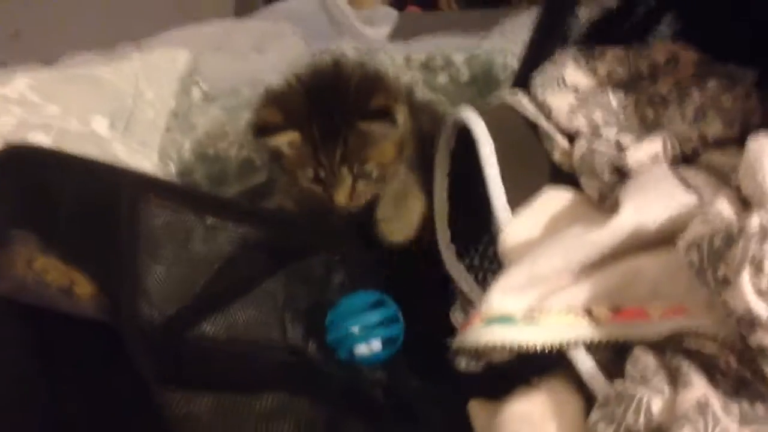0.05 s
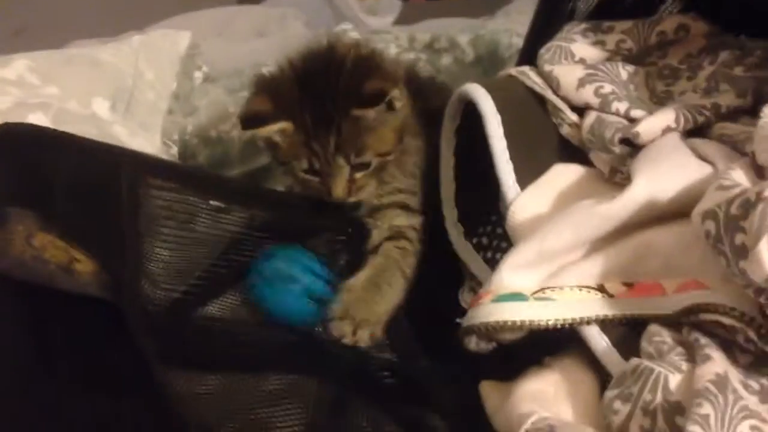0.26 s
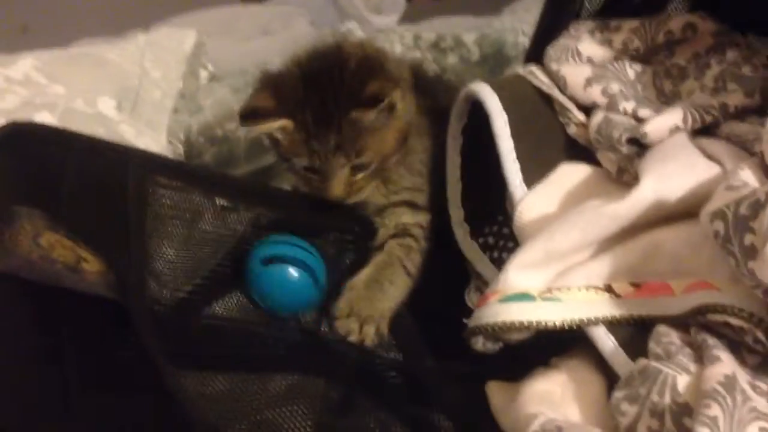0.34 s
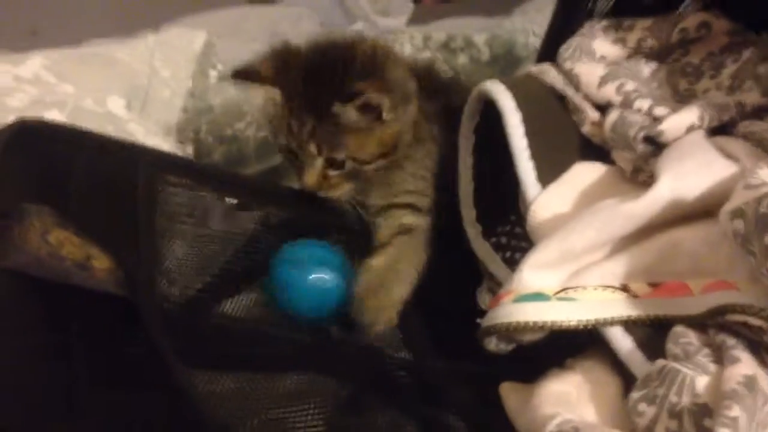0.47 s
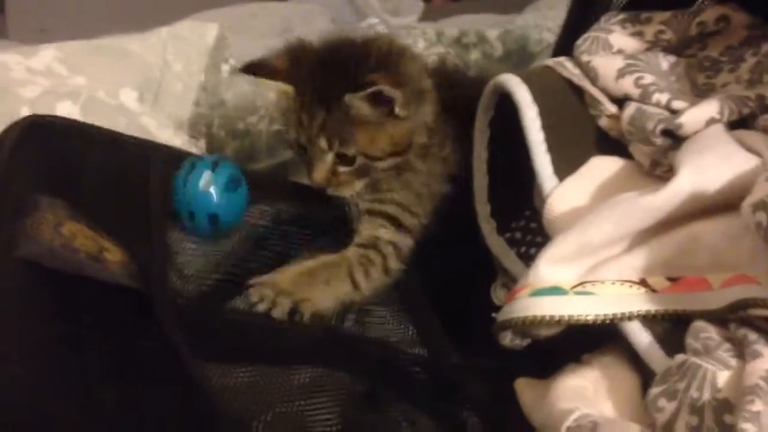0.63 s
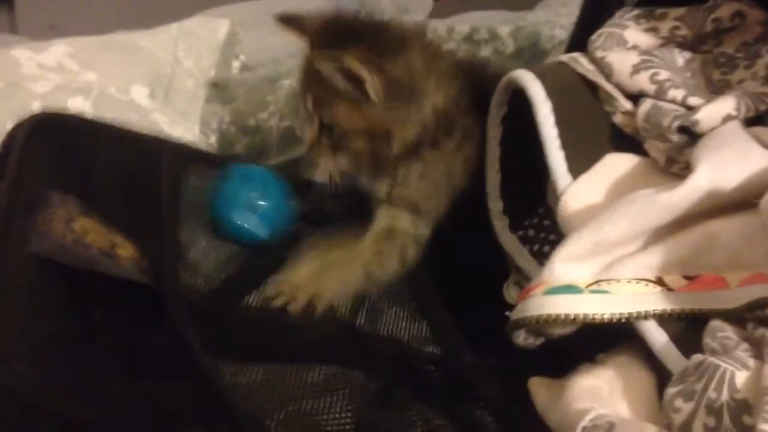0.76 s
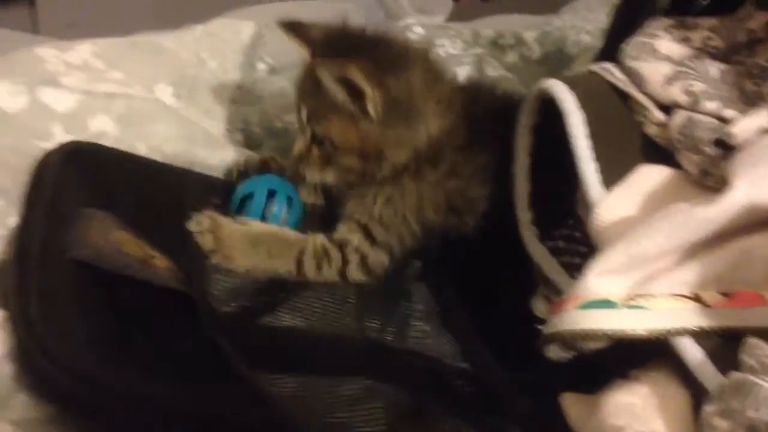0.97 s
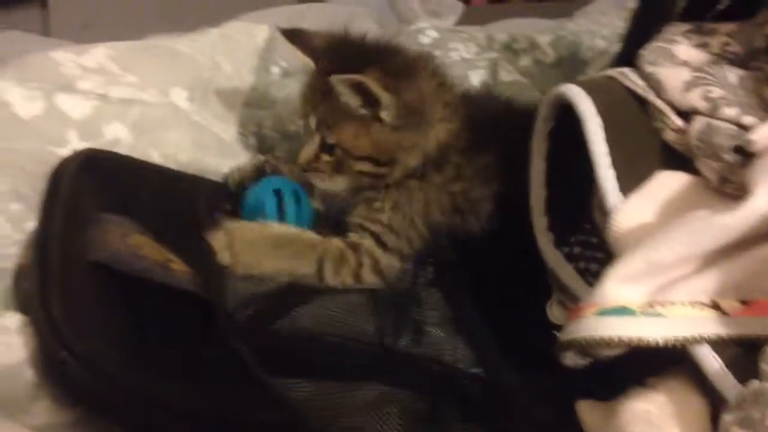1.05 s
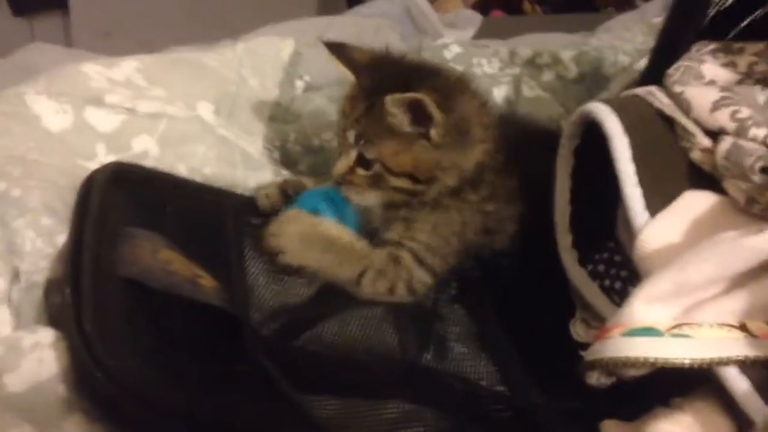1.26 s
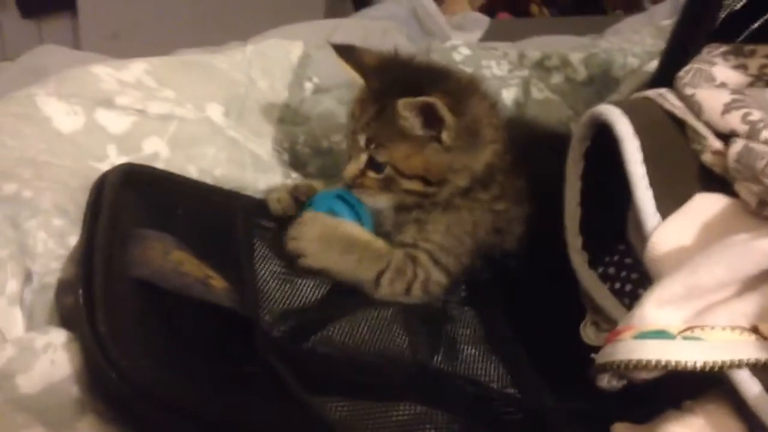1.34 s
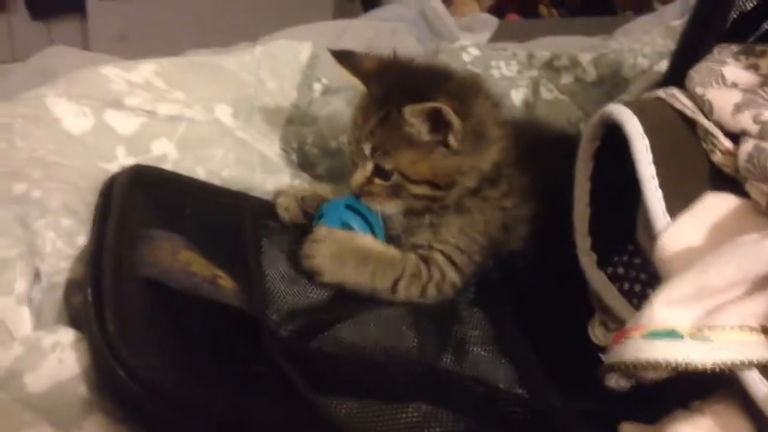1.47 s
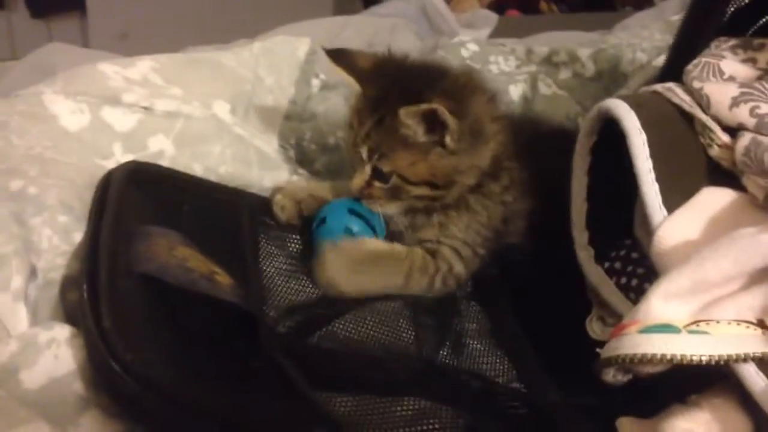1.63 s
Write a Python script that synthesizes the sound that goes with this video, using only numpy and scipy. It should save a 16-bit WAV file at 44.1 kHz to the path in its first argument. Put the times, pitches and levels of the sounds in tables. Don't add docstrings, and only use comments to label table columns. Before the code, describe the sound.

A small bell in a plastic ball jingles as a kitten bats it. Quiet room hum and a soft paw thump open; light ticks start near 0.2 s, then sharp, very high jingles and hollow plastic knocks crowd together from 0.42 to 0.97 s, with faint cloth rustle. They thin to sparse tinkles, one clearer at 1.28 s, with a soft thump at 1.4 s, leaving hum and faint hiss.

```python
import sys
import numpy as np
from scipy import signal
from scipy.fft import rfft, irfft
from scipy.io import wavfile
from scipy.ndimage import uniform_filter1d

SR = 44100
rng = np.random.default_rng(int(sys.argv[2]) if len(sys.argv) > 2 else 0)


def unload_wav(signal):
    wavfile.write(
        sys.argv[1],
        SR,
        np.round(np.clip(np.atleast_2d(signal).T, -1, 1) * 32767).astype(np.int16),
    )


def amplitude_ratio(level_db):
    exponent = np.asarray(level_db, float) / 20
    return 10 ** exponent


N = 74970
TIME = np.arange(N) / SR

# t/s, level/dB
STIRRING = [(0, -83), (.185, -107), (.205, -65.5), (.3, -62), (.36, -92), (.43, -84), (.49, -67.5),
            (.6, -64.5), (.67, -71), (.77, -76.5), (.85, -66), (.95, -57), (1.05, -67), (1.13, -72),
            (1.4, -83), (1.47, -87.5)]
# f/Hz, level/dB
BRIGHT_COLOUR = [(1500, -13.5), (4500, -8.5), (5600, -2), (8500, 6.5), (10500, -11.5), (15000, -26)]


def evened(x):
    return x / np.sqrt(np.mean(x ** 2) + 1e-20)


def add(mix, start_s, sound):
    part = mix[max(round(start_s * SR), 0):][:len(sound)]
    part += sound[:len(part)]


def along(curve):
    return amplitude_ratio(np.interp(TIME, *np.transpose(curve)))


def colour(x, points):
    f, db = np.transpose(points)
    hz = np.fft.rfftfreq(len(x), 1 / SR)
    gain = amplitude_ratio(np.interp(np.log(hz + 1), np.log(f + 1), db))
    return irfft(rfft(x) * gain, len(x))


def resonate(x, hz, width_hz):
    turn = np.exp(2j * np.pi * hz * np.arange(len(x)) / SR)
    r = np.exp(-np.pi * abs(width_hz) / SR)
    smooth = signal.lfilter([1 - r], [1, -r], x / turn)
    return 2 * (turn * smooth).real


def high(x, hz):
    return signal.sosfilt(signal.butter(4, hz, "high", fs=SR, output="sos"), x)


def grit(per_s, spread_db):
    chance, size, sign = rng.random((N, 3)).T
    strength = amplitude_ratio(-spread_db * np.log(size + 1e-3))
    return evened((chance < per_s / SR) * strength * (sign - .5))


def snap(noise, t60):
    fade = amplitude_ratio(-60 * np.arange(len(noise)) / SR / t60)
    burst = noise * fade
    burst = burst * np.linalg.norm(fade) / np.linalg.norm(burst)
    return colour(burst, BRIGHT_COLOUR)[:len(noise) // 2]


def bell():
    # t/s, level/dB, place on the rim/degrees, ring time to -60 dB/s
    pellet_strikes = [(.0715, -65, 7, 0.07), (.2085, -63, 27, 0.022), (.2122, -48, 11, 0.022),
                      (.2399, -30, 8, 0.036), (.287, -48, 1, 0.073), (.3255, -55, 17, 0.024),
                      (.335, -55, 77, 0.042), (.3953, -45.5, 7, 0.035), (.4242, -25, 26, 0.0072),
                      (.4431, -36.5, -8, 0.038), (.4576, -33, -10.5, 0.045), (.4666, -32.5, 10, 0.043),
                      (.478, -47.5, 13, 0.16), (.4875, -33.5, 12, 0.012), (.494, -43, 13.5, 0.081),
                      (.5165, -45.5, 12, 0.05), (.5412, -46.5, 26, 0.061), (.5584, -18.5, 47.5, 0.039),
                      (.58, -38.5, 49, 0.16), (.5918, -30.5, -0.5, 0.053), (.6013, -65, 37, .08),
                      (0.626, -26.5, -27, 0.032), (0.648, -32, 5.5, 0.034), (.6582, -87, 8, .08),
            (0.6781, -29, 12, .035), (0.6999, -29.5, -14, .04), (.716, -20, 34, 0.032),
            (.7245, -47, -19, .03), (0.7299, -22, 22, 0.044), (0.7431, -28, 13.5, 0.038),
            (.761, -44, 20.5, 0.059), (0.7891, -48, 11, 0.033), (0.8045, -34.5, 11, .035),
            (0.8287, -39, 38, .06), (0.8347, -35.5, 41, 0.044), (0.841, -38.5, 15, 0.055),
            (0.863, -42, 20, 0.036), (0.8652, -31, 52, 0.06), (0.9098, -24, 13, 0.038),
            (.921, -29.5, -32, .025), (0.931, -52, 30, .05), (0.9384, -32, 18, 0.084),
            (0.9465, -31, 31, 0.032),
                      (0.974, -44, 33, 0.026), (0.987, -32.5, 6, 0.067), (1.0003, -34.5, -50, 0.065),
             (1.0258, -38, -25, 0.055), (1.035, -40, 43, 0.046), (1.047, -45.5, 20, 0.055),
             (1.0565, -51.5, 26, 0.073), (1.076, -56, 22, 0.05), (1.1145, -73, 16, 0.041),
             (1.1328, -63.5, 65, 0.15), (1.191, -58, 28, 0.082), (1.2405, -57, 20, 0.047),
             (1.2822, -36.5, 10, 0.039), (1.298, -54.5, 7.2, 0.16), (1.349, -72, 6, 0.037),
             (1.37, -43.5, 13, 0.035), (1.395, -55, 15, 0.067), (1.4066, -54.5, 1, 0.04)]
    bell_hz, upper_hz, detune_hz = 9590, 9810, 15.5
    choked_gain, choke_s = .2, 0.000745
    strikes = pellet_strikes
    next_contacts = [strike[0] for strike in strikes[1:]] + [N / SR]
    out, t = np.zeros(N), np.arange(SR // 8) / SR
    detunes = rng.standard_normal((len(strikes), 2))
    noises = rng.standard_normal((len(strikes), 512))
    for strike, after, (a, b), noise in zip(strikes, next_contacts, detunes, noises):
        s, db, deg, t60 = strike
        lower = np.cos(np.radians(deg)) * np.sin(2 * np.pi * (bell_hz + detune_hz * a) * t)
        upper = np.sin(np.radians(deg)) * np.sin(2 * np.pi * (upper_hz + detune_hz * b) * t)
        fade = amplitude_ratio(db - 60 * t / max(t60, .01))
        choke = choked_gain + (1 - choked_gain) * np.clip((after - s - t) / choke_s, 0, 1)
        onset = np.minimum(t / 0.0003, 1)
        add(out, s, fade * (lower - upper) * choke * onset)
        tick_db = 0.49 * (db + 49.5) - 45 + 3
        add(out, s, amplitude_ratio(tick_db) * high(snap(noise, .0018), 5000))
    return out + pellet_skitter(bell_hz, upper_hz)


def pellet_skitter(bell_hz, upper_hz):
    contacts = grit(240, 2.5) * (np.arange(N) < 1.43 * SR)
    ring = resonate(contacts, bell_hz, 44.9) - .5 * resonate(contacts, upper_hz, 70)
    ticks = high(colour(contacts, BRIGHT_COLOUR), 5000)
    return along(STIRRING) * (amplitude_ratio(1) * evened(ring) + amplitude_ratio(-13) * ticks)


def taps():
    # t/s, peak level/dB, pitch f/Hz, width as a share of the pitch
    shell_knocks = [(0.234, -43.5, 7040, 0.26), (0.2364, -44, 6140, .25), (.327, -53, 3400, 0.56),
                    (.391, -48.5, 4540, 0.89), (0.4247, -36, 5450, 0.31), (0.469, -44, 2500, 0.37),
                    (.487, -40.5, 2980, 1), (.494, -38, 3250, 0.64), (0.543, -44, 1500, 2),
                    (0.5452, -43, 3570, 0.52), (0.557, -42.5, 2500, 0.6), (0.5691, -36, 2840, 0.43),
                    (.626, -50, 4000, 1.4), (0.639, -47, 1590, .6), (0.6429, -46.5, 3000, 1.1),
                    (.647, -42, 3400, 0.66), (.651, -48.5, 2600, 1.1), (.678, -48, 2770, 0.37),
                    (.7135, -46.5, 1690, 1.1), (.716, -42, 3500, .9), (.742, -52, 2500, 0.75),
                    (.8125, -49, 2780, 0.4), (0.882, -45.5, 1590, 0.43), (.9, -44.5, 770, 1.3),
                    (.909, -42, 3050, 0.65), (.923, -42, 3500, 1.3), (0.941, -45, 1570, 0.23),
                    (0.947, -40, 2590, 0.32), (0.9718, -32.5, 2240, 0.64), (1.027, -46.5, 2100, 0.45),
                    (1.052, -54, 2200, .6), (1.068, -46.5, 2200, .6), (1.076, -45, 2480, .9),
                    (1.091, -49, 1450, 0.31), (1.118, -51.5, 2140, 0.68), (1.215, -51.5, 2760, 0.89),
                    (1.236, -53.5, 2820, 0.12), (1.349, -56.5, 2970, 0.65), (1.371, -56, 2190, 1.1)]
    # t/s, peak level/dB
    bar_clicks = [(.197, -60), (0.2, -58), (.2045, -62), (.253, -53), (0.3036, -49), (.335, -42.5),
                  (.3495, -55), (.476, -46), (.482, -39), (0.51, -43), (.513, -41), (.528, -54),
                  (0.5449, -33), (.5695, -26.5), (0.58, -41), (0.584, -33), (.5875, -52.5), (.626, -31),
                  (0.658, -47), (0.7134, -45.5), (0.7159, -29.5), (0.7004, -40.5), (0.784, -42.5),
                  (.8125, -52), (.8559, -36.5), (.862, -36), (0.8813, -41), (0.894, -48.5), (.9094, -20),
                  (.9234, -31), (0.933, -37), (.955, -56), (.972, -29.5), (0.9738, -35.5), (1.026, -36),
                  (1.055, -45), (1.077, -50), (1.143, -59), (1.187, -53), (1.197, -56), (1.24, -41.5),
                  (1.247, -55), (1.32, -53.5), (1.335, -47.5), (1.37, -43), (1.348, -50)]
    knock_t60, click_t60, snap_db = .005, .003, -4
    out, t = np.zeros(N), np.arange(512) / SR
    noises = rng.standard_normal((len(shell_knocks) + len(bar_clicks), 512))
    for (s, db, hz, wide), noise in zip(shell_knocks, noises):
        burst = noise * amplitude_ratio(-60 * t / knock_t60)
        knock = resonate(resonate(burst, hz, wide * hz), hz, wide * hz)
        edge = amplitude_ratio(snap_db) * high(burst, 0.5 * hz) * wide / 2
        add(out, s, amplitude_ratio(db) * (knock / abs(knock).max() + edge))
    for (s, db), noise in zip(bar_clicks, noises[len(shell_knocks):]):
        click = snap(noise, click_t60)
        add(out, s, amplitude_ratio(db) * click / abs(click).max())
    return out


def rustle():
    # f/Hz, level/dB
    cloth_colour = [(300, -28), (900, -6), (2200, -1), (4600, -9), (7500, -5.5), (9800, -6.5),
                    (11000, -16.5), (14500, -12.5)]
    rattles_per_s = 700
    low, bright = grit(rattles_per_s, 2), grit(rattles_per_s, 2)
    hollow = evened(resonate(resonate(low, 2307, 1440), 1950, 1300))
    rattle = hollow + amplitude_ratio(-22) * evened(colour(bright, BRIGHT_COLOUR))
    lumps = amplitude_ratio(4.5 * evened(uniform_filter1d(rng.standard_normal(N), 160)))
    rub = evened(colour(rng.standard_normal(N), cloth_colour)) * lumps
    return along(STIRRING) * (amplitude_ratio(0.5) * rub + amplitude_ratio(-5) * evened(rattle))


def thumps():
    # t/s, level/dB, f/Hz
    paw_pushes = [
        (.004, -44, 140),
        (0.079, -59, 93),
        (.905, -65, 64),
        (.925, -47.5, 151),
        (1.407, -47, 120.5),
        (1.509, -65, 72),
    ]
    # t/s, length/s, f/Hz, level/dB
    squeak = (.125, .1, 3270, -76)
    out, t = np.zeros(N), np.arange(SR // 10) / SR
    for s, db, hz in paw_pushes:
        swell = np.e * t * hz * np.exp(-t * hz * 1.66)
        add(out, s, amplitude_ratio(db) * swell * np.sin(2 * np.pi * hz * t))
    s, length, hz, db = squeak
    swell = np.sin(np.pi * np.clip(t / length, 0, 1))
    add(out, s, amplitude_ratio(db) * swell * np.sin(2 * np.pi * hz * t))
    return out


def room_tone():
    # f/Hz, level/dB
    air_colour = [(20, -56.5), (60, -38.5), (130, -9), (280, -8), (500, -16.5), (1100, -13.5), (2200, -24),
                  (5000, -43.5)]
    # t/s, level/dB
    room_drift = [(0.0, -56.5), (1.7, -62)]
    # f/Hz, width/Hz, level/dB
    hum_bands = [(183, 88, -6), (236.9, 23, -8.5), (297, 17, -9.5)]
    # f/Hz, level/dB
    hiss_colour = [(4000, 15), (9500, 9), (10800, -8), (12000, 9), (15000, 13.5)]
    air_noise, hum_noise, hiss_noise = rng.standard_normal((N, 3)).T
    hum = np.zeros(N)
    for hz, width, db in hum_bands:
        hum += amplitude_ratio(db) * evened(resonate(resonate(hum_noise, hz, width), hz, width))
    note_db = -1 - 5 * np.minimum(TIME, 1)
    hum += amplitude_ratio(note_db) * np.sin(2 * np.pi * 239.5 * TIME)
    air = evened(colour(air_noise, air_colour))
    hiss = amplitude_ratio(-85.5) * high(colour(hiss_noise, hiss_colour), 2500)
    return along(room_drift) * (amplitude_ratio(-3.5) * air + amplitude_ratio(-1) * hum) + hiss


def scene():
    ball, t = bell() + taps(), np.arange(SR // 5) / SR
    room_db, room_t60 = -15, .09
    tail = rng.standard_normal(len(t)) * amplitude_ratio(-60 * t / room_t60) * (t > .002)
    wet = signal.fftconvolve(ball, tail / np.linalg.norm(tail))[:N]
    return (ball + amplitude_ratio(room_db) * wet + rustle() + thumps() + room_tone())[None]


def low_pass(x):
    return signal.sosfilt(signal.butter(12, 16380, fs=SR, output="sos"), x)


def record(dry):
    # start t/s, end t/s, lowest f/Hz, highest f/Hz
    dropouts = [(0.208, 0.24, 10500, 11800), (0.287, .37, 10300, 11000), (.401, .42, 10700, 13600),
                (0.414, .478, 10740, 16000), (.562, .567, 11460, 14000), (.6, .62, 11800, 13200),
                (.48, .533, 10700, 11500), (0.67, .675, 10700, 13500), (0.683, .697, 10700, 16000),
                (0.699, .72, 14500, 16000), (.703, .713, 10700, 14600), (0.717, .758, 10770, 16000),
                (.758, .785, 10570, 11600), (.758, .77, 13500, 16000), (.79, 0.806, 10800, 14000),
                (.838, .882, 10800, 13000), (1.01, 1.035, 11200, 12700), (1.056, 1.075, 11600, 13400),
                (1.09, 1.23, 10600, 11050), (1.24, 1.256, 10500, 12000), (1.268, 1.287, 10500, 11300),
                (1.282, 1.3, 10600, 16000), (1.293, 1.365, 10500, 11100), (1.382, 1.41, 10300, 11600),
                (1.375, 1.39, 11600, 14000)]
    spike_db = -42
    x = signal.oaconvolve(dry, signal.firwin(255, 15400, fs=SR)[None], "same")
    lost = 0
    for start, end, low_hz, top_hz in dropouts:
        band_filter = signal.firwin(511, [low_hz, top_hz], pass_zero=False, fs=SR)
        band = signal.oaconvolve(x, band_filter[None], "same")
        quiet = uniform_filter1d(band[0] ** 2, size=64) < amplitude_ratio(2 * spike_db)
        gate = 1. * (TIME > start) * (TIME < end) * quiet
        lost = lost + band * uniform_filter1d(gate, size=128)
    mix = high(x - lost, 40)
    return low_pass(mix)


dry = scene()
out = record(dry)
unload_wav(out)
```